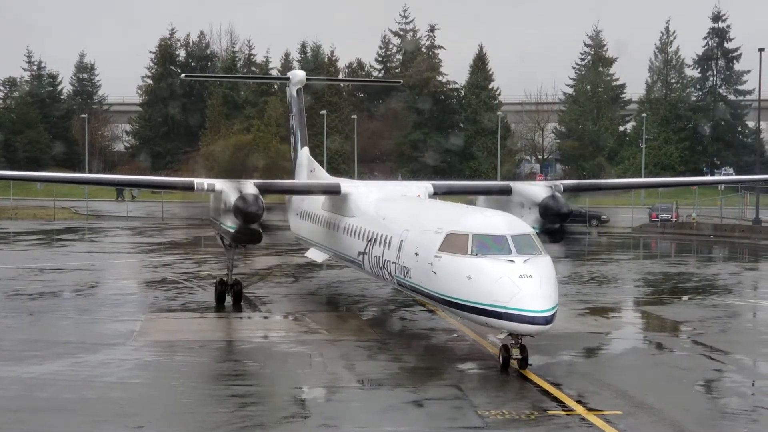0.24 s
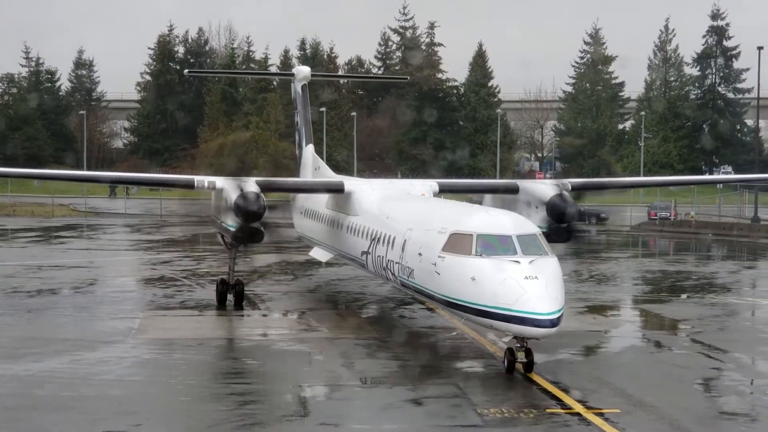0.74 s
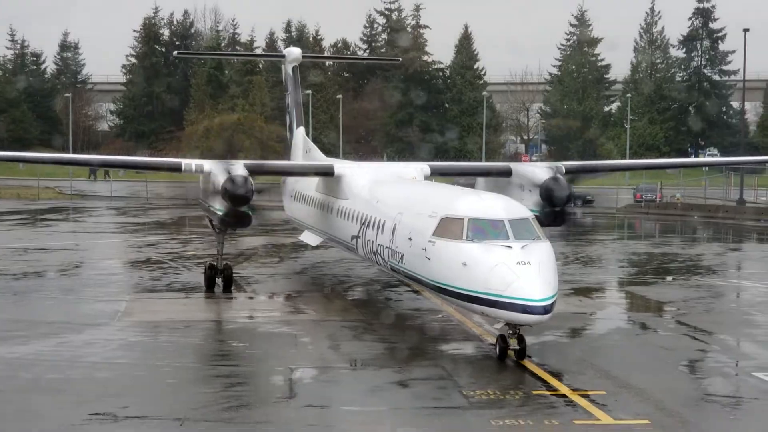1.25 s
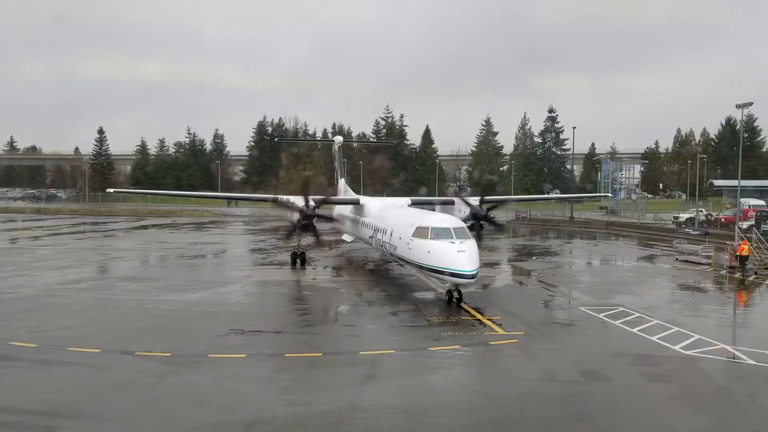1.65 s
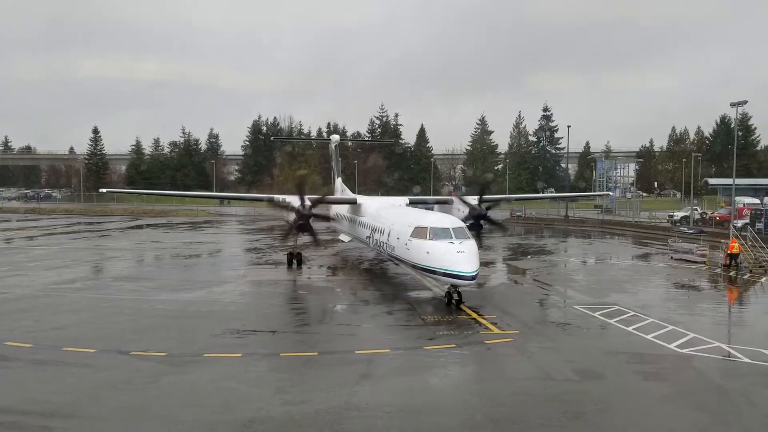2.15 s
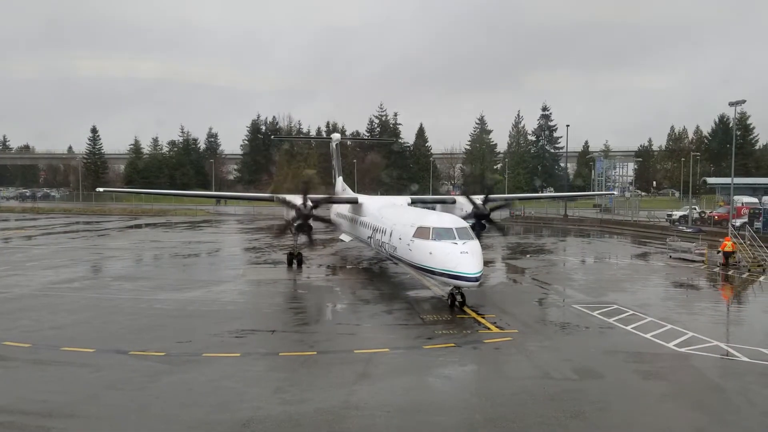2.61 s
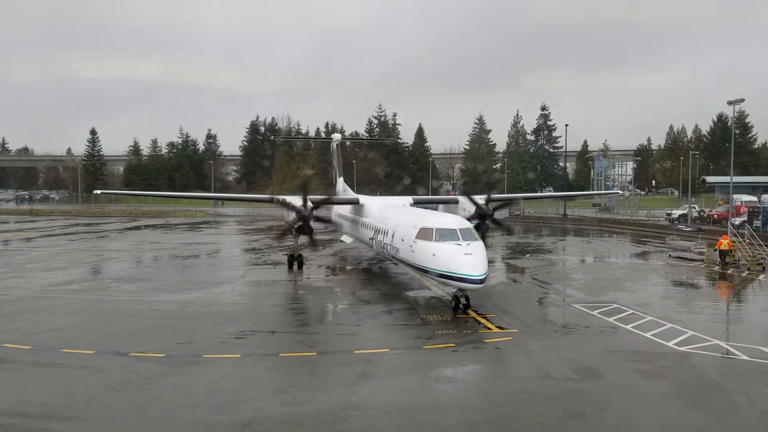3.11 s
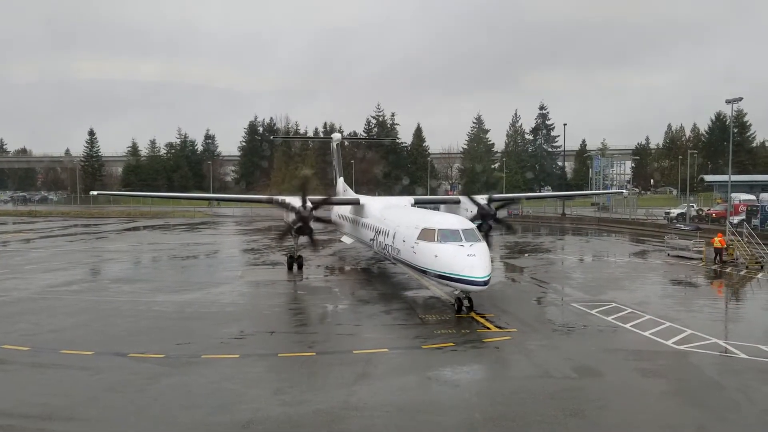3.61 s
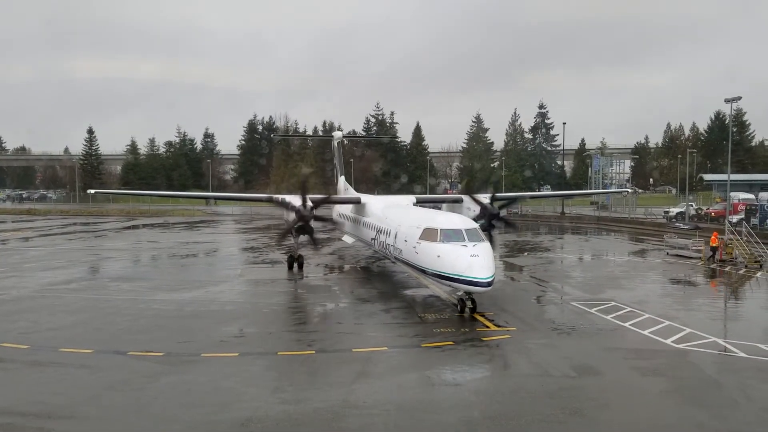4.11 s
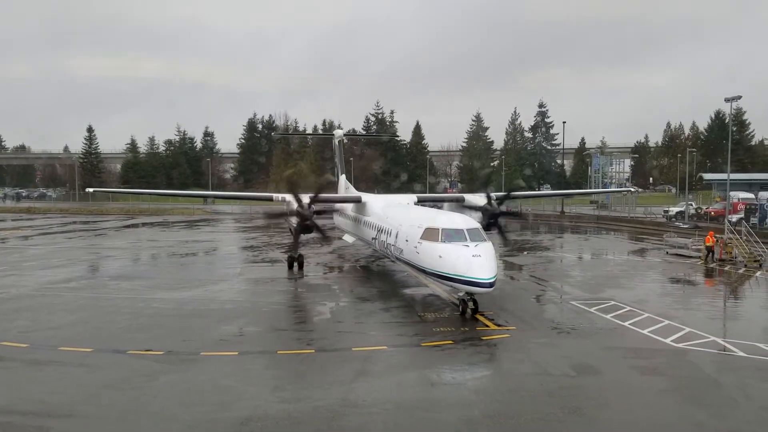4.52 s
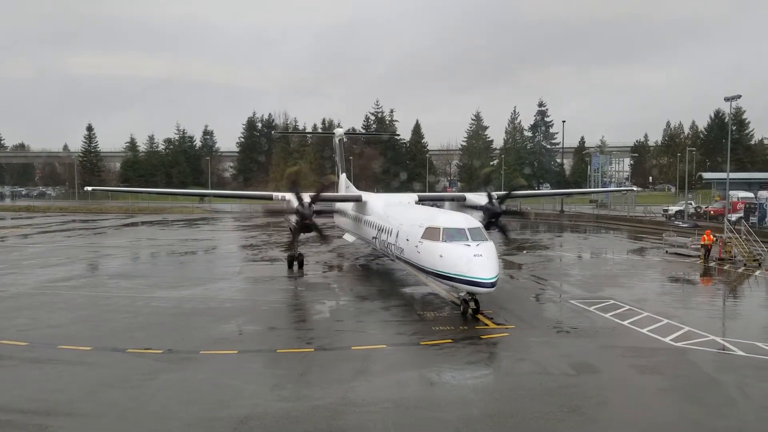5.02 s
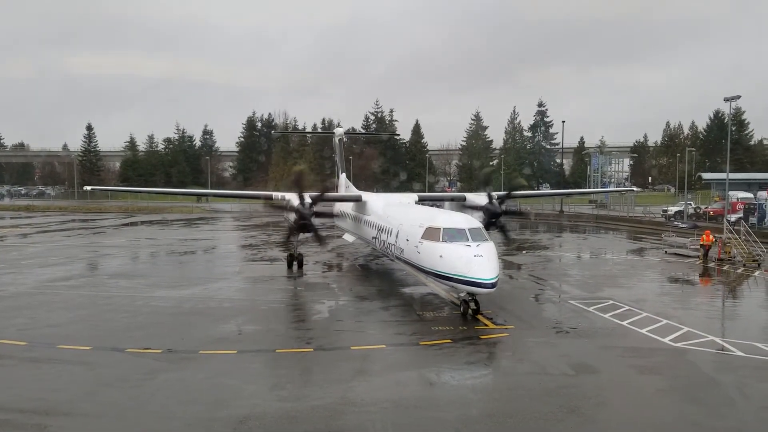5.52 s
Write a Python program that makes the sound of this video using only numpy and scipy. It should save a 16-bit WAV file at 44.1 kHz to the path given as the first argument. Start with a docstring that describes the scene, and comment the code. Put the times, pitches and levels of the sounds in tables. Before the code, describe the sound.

Continuous turboprop engine noise heard in stereo from some distance outside: uneven deep propeller hum, rushing wash and hissing intakes, with a thin, rough-edged, high whine leaning left. A cluster of close dry clicks comes early, followed by one faint chirp; another lighter click arrives late. The roar gradually swells in the last part as the aircraft taxis closer, ending still running.

```python
"""Wet apron: a twin turboprop taxis towards the microphones.
Each compressor whines near 4.1 kHz, chopped into sidebands by its six propeller blades.
The propellers drone as pairs of wavering tones; intakes and exhausts roar as coloured noise.
Close by, dry noise bursts snap, mostly early on, and a brief faint tone squeaks once."""
import sys
import numpy as np
from scipy import signal
from scipy.fft import rfft, irfft, next_fast_len
from scipy.io import wavfile
from scipy.ndimage import uniform_filter1d, map_coordinates

SR = 44100
rng = np.random.default_rng(int(sys.argv[2]) if len(sys.argv) > 2 else 0)


def rack_gain(trim_db):
    """Turn a fader trim in dB into the linear factor to multiply a signal by."""
    fader = np.asarray(trim_db, float)
    return 10 ** (fader / 20)


def store_wav(level_fs):
    """Save 16-bit WAV to argv[1]."""
    pcm = np.round(np.clip(np.atleast_2d(level_fs), -1, 1) * 32767)
    wavfile.write(sys.argv[1], SR, pcm.T.astype(np.int16))


N = 253575


def unit(x):
    """Scale to rms 1 over all channels."""
    return x / np.sqrt(np.mean(x ** 2) + 1e-20)


def along(points, hz):
    """Interpolate (hz, value) points on a log frequency axis."""
    point_hz, value = np.transpose(points)
    return np.interp(np.log(hz + 1), np.log(point_hz + 1), value)


def spectrum(points):
    """Gain function of frequency from (hz, gain_db) points."""
    return lambda hz: rack_gain(along(points, hz))


def peaks(modes):
    """Gain function of frequency: a sum of narrow (centre_hz, width_hz, level_db) bands."""
    return lambda hz: sum(rack_gain(level_db) / np.sqrt(width_hz) / (1 + (2 * (hz - centre_hz) / width_hz) ** 4)
                          for centre_hz, width_hz, level_db in modes)


def curves(rows):
    """One value per sample for each column after the time."""
    time_s, *columns = np.transpose(rows)
    return [np.interp(np.arange(N) / SR, time_s, column) for column in columns]


def wobble(rate_per_s):
    """Smooth random curve through normal knots, at most 60 a second."""
    return map_coordinates(rng.standard_normal(400), [np.arange(N) * np.clip(rate_per_s, 0, 60) / SR])


def tone(hz, turn_cycles=0):
    """Sine of rms 1 that follows a pitch curve from a random phase."""
    return np.sqrt(2) * np.sin(2 * np.pi * (np.cumsum(hz) / SR + rng.random() + turn_cycles))


# left-right correlation before the lean: hz, correlation
LIKENESS = [(60, 0.91), (110, 1), (200, 0.9), (380, 0.7), (700, 0.66), (1290, 0.065), (2380, 0.56),
            (4390, 0.31), (8110, 0.33), (15000, 0.12)]
# stereo lean: hz, left_over_right_db
STEREO_LEAN = [(60, -1.5), (180, 2.5), (550, 1), (1650, 2.5), (4970, 4), (15000, 1)]


def rush(gain, patchy_db):
    """Stereo noise, rms 1 over both channels, coloured by gain(hz), in time-frequency patches."""
    bins = signal.stft(rng.standard_normal((2, N)), nperseg=512)[2]
    field = uniform_filter1d(rng.standard_normal(bins.shape[1:]), 6, 0)
    field = uniform_filter1d(field, 14, 1)
    pair = signal.istft(bins * rack_gain(patchy_db * unit(field)), nperseg=512)[1]
    size = next_fast_len(N + 8192)
    hz = np.fft.rfftfreq(size, 1 / SR)
    # mid/side balance sets the correlation
    angle = np.arccos(np.clip(along(LIKENESS, hz), -1, 1)) / 2
    mid, side = rfft(pair, size) * gain(hz) * [np.cos(angle), np.sin(angle)]
    lean = rack_gain(along(STEREO_LEAN, hz) / 2)
    return unit(irfft([(mid + side) * lean, (mid - side) / lean], size)[:, :N])


# level change as the aircraft comes closer: time_s, approach_db
APPROACH = [(0, 1), (.45, 0), (.9, -0.5), (3.0, 0.5), (4.0, 0.4), (4.5, 3.5), (5.05, 3.5), (5.55, 4),
            (5.75, 5)]


def approach():
    """Curve in dB that the wash, exhaust, hiss, ducts and upper hums follow by their own factors."""
    return curves(APPROACH)[0]


# prop wash noise: hz, relative_gain_db
AIRFLOW_SPECTRUM = [(12, -56), (25, -15.5), (60, -8.5), (96, -2), (115, -8), (170, -6), (260, -6.5),
                    (400, -10.5), (440, -16.5), (530, -12.5), (600, -16.5), (850, -21), (950, -41.5),
                    (1300, -53)]
# higher blade tones smeared into noise: centre_hz, width_hz, relative_level_db
WASH_BANDS = [(504.7, 7.2, -1), (545.5, 21, 0.5), (626, 22, -4.5)]
# exhaust noise: hz, relative_gain_db
EXHAUST_SPECTRUM = [(500, -27), (900, -1), (1450, -5), (1900, -4.5), (2300, -3.5), (3200, -43.5)]
# intake hiss: hz, relative_gain_db
HISS_SPECTRUM = [(1500, -16.5), (2200, -1), (2900, 2), (3500, -1), (4700, -2.5), (5850, -4), (7000, -11),
                 (8500, -25), (10000, -23), (11000, -30), (14200, -32), (14400, -49), (14700, -75)]
# faint duct resonances on the hiss: centre_hz, width_hz, relative_level_db
DUCT_BANDS = [(5870, 200, 0), (10030, 200, -15), (12350, 120, -19), (14170, 100, -18)]
# narrow noisy intake howl: centre_hz, width_hz, relative_level_db
HOWL_BANDS = [(2515, 140, 0), (2530, 50, -12)]
# intake howl before flutter: time_s, level_db
HOWL_CURVE = [(0, -53.5), (1.1, -53), (1.75, -51.5), (2.4, -51.5), (3.15, -45), (3.7, -48.5), (3.95, -43),
              (4.3, -49.5), (5.05, -44), (5.75, -47.5)]


def engines_roar():
    """Prop wash below, exhaust in the middle, intake hiss above, and noisy duct resonances."""
    approach_db = approach()
    flow_db = -32.5 + 0.88 * approach_db + .5 * wobble(2.98)
    exhaust_db = -49 + 1.35 * approach_db + .5 * wobble(2.98)
    hiss_db = -42 + 0.54 * approach_db + .5 * wobble(2.98)
    howl_db = curves(HOWL_CURVE)[0] + 1.16 * wobble(30)
    flow = rack_gain(flow_db) * rush(spectrum(AIRFLOW_SPECTRUM), patchy_db=0.64)
    wash = rack_gain(flow_db - 15) * rush(peaks(WASH_BANDS), patchy_db=0.5)
    exhaust = rack_gain(exhaust_db) * rush(spectrum(EXHAUST_SPECTRUM), patchy_db=0.98)
    hiss = rack_gain(hiss_db) * rush(spectrum(HISS_SPECTRUM), patchy_db=1.16)
    ducts = rack_gain(hiss_db - 17 + .3 * approach_db) * rush(peaks(DUCT_BANDS), patchy_db=4.0)
    howl = rack_gain(howl_db) * rush(peaks(HOWL_BANDS), patchy_db=-0.2)
    return flow + wash + exhaust + hiss + ducts + howl


# snaps near the microphones, nominal levels: start_s, body_db, rattle_t60_s, treble_db
SNAP_EVENTS = [(.478, -54, .15, -54), (.5, -56, .1, -58), (.515, -55, .03, -51), (0.572, -32.5, 0.1, -70),
               (.5785, -25.5, .16, -39), (0.591, -36, 0.12, -56), (.598, -43, .1, -62),
               (.605, -44, .2, -66), (1.625, -58, .08, -62), (4.37, -43, .1, -60), (5.2, -54, .3, -58)]
# snap body: hz, relative_gain_db
SNAP_SPECTRUM = [(600, -24), (1000, -12), (2000, -10), (2600, -5), (3400, -1), (4300, -6), (5800, 0),
                 (7200, -7), (8200, -15), (10000, -16), (12000, -23), (15400, -27)]
# snap treble: centre_hz, width_hz, relative_level_db
SNAP_TREBLE = [(10000, 1500, 0), (13000, 4000, -2)]


def snaps():
    """Dry noise bursts: a sharp head and a weaker, uneven rattle behind it."""
    head_t60_s, attack_s = .022, .0004
    t = np.arange(N) / SR
    envelopes = np.zeros((2, N))  # body, treble
    rattle = rack_gain(2.5 * unit(uniform_filter1d(rng.standard_normal(N), size=40)))
    for start_s, body_db, rattle_t60_s, treble_db in SNAP_EVENTS:
        since_s = np.clip(t - start_s, 0, None)
        attack = 1 - np.exp(-since_s / attack_s)
        head = rack_gain(-60 * since_s / head_t60_s)
        tail = .27 * rattle * rack_gain(-60 * since_s / rattle_t60_s)
        envelopes += rack_gain([[body_db], [treble_db]]) * attack * (head + tail)
    body = envelopes[0] * rush(spectrum(SNAP_SPECTRUM), patchy_db=0)
    treble = envelopes[1] * rush(peaks(SNAP_TREBLE), patchy_db=0)
    return body + treble


# faint squeak: start_s, length_s, pitch_hz, peak_rms_db
SQUEAK_EVENT = (.708, .035, 4900, -45)


def squeak():
    """A brief, nearly steady tone under a smooth rise and fall."""
    start_s, length_s, pitch_hz, peak_rms_db = SQUEAK_EVENT
    progress = np.clip((np.arange(N) / SR - start_s) / length_s, 0, 1)
    return rack_gain(peak_rms_db) * np.sin(np.pi * progress) * tone(pitch_hz + 6 * wobble(50))


# hums: main_hz, partner_hz, partner_re_main_db, waver_hz, waver_rate_per_s, flutter_db
HUM_PAIRS = [(66.06, 38, -18.5, 1.1, 5, 0.5), (131.2, 124, -4, 1.994, 8, 1.5),
             (195.1, 190, -10, 1.235, 6, 2.3), (251, 262, -4, 3.49, 12, 2.13),
             (328.7, 313, -4, 3.99, 12, 2.5), (379.2, 387, -2.5, 2.98, 10, 0.5)]
# lowest hum before dips and trim: time_s, level_db
LOW_HUM_CURVE = [(0, -37), (.5, -33.5), (1.3, -38), (1.85, -46), (2.15, -30), (2.5, -28.5), (2.65, -37),
                 (2.9, -30), (3.2, -37.5), (3.45, -26.5), (3.75, -31.5), (4.0, -36), (4.4, -39.5),
                 (4.9, -23), (5.03, -28), (5.15, -26.5), (5.3, -33), (5.75, -34)]
# hums above it, in order, before dips and trim: base_db, gain_db_per_approach_db
UPPER_HUM_LEVELS = [(-36.5, 1.38), (-37.5, .3), (-34.5, .5), (-40, -1.1), (-39.5, -0.6)]
# uneven loudness of the upper hums, louder stretches: middle_s, hum_hz, gain_db, length_s
HUM_LOUD_STRETCHES = [(0.096, 195, 12.5, 0.4), (0.103, 251, 7.5, 0.16), (0.295, 329, 5.5, 0.26),
                      (0.456, 378, 6, 0.28), (.5, 195, 9.5, 0.37), (.55, 251, 6.5, 0.11),
                      (1.0, 131, 7.5, 0.66), (1.0, 329, 4.5, 0.53), (1.03, 195, 11, 0.56),
                      (1.2, 251, 5.5, 0.6), (1.61, 378, 5, 0.37), (1.657, 195, 10, 0.58),
                      (1.948, 251, 6.5, .1), (2.0, 131, 11.5, 0.092), (2.098, 378, 7, 0.27),
                      (2.2, 131, 7, 0.16), (2.43, 195, 11, 0.2), (2.514, 251, 5.5, 1),
                      (2.832, 329, 10, .18), (2.86, 131, 9, 0.2), (2.927, 195, 12.5, 0.24),
                      (3.24, 251, 5.5, 0.21), (3.725, 195, 11, 0.4), (3.91, 378, 9, 0.089),
                      (3.92, 251, 9, .16), (3.96, 131, 7.5, 0.34), (4.202, 378, 9, 0.28),
                      (4.33, 195, 6.5, 0.32), (4.466, 251, 6, 0.16), (4.5, 131, 10, 0.059),
                      (4.818, 131, 3.5, 0.15), (4.89, 251, 4, 0.26), (5.2, 195, 7.5, .22),
                      (5.217, 378, 9.5, 0.14), (5.194, 251, 4.5, .1), (5.586, 251, 6.5, 0.49),
                      (5.652, 131, 5, 0.22)]


def hum_levels():
    """dB over time: lowest hum by its own curve, others by approach and louder stretches; all dip randomly."""
    dip_db, dip_rate_per_s = 1.8, 12
    approach_db = approach()
    levels = curves(LOW_HUM_CURVE)
    levels += [base_db + growth * approach_db for base_db, growth in UPPER_HUM_LEVELS]
    levels = np.array([db - dip_db * np.clip(wobble(dip_rate_per_s), 0, None) ** 2 for db in levels])
    for middle_s, hum_hz, gain_db, length_s in HUM_LOUD_STRETCHES:
        nearest = np.argmin([abs(hum[0] - hum_hz) for hum in HUM_PAIRS])
        levels[nearest] += gain_db * np.exp(-(2 * (np.arange(N) / SR - middle_s) / length_s) ** 4)
    return levels


def propellers():
    """Blade tones blurred by turbulence: each hum is two wavering tones, mostly close enough to beat;
    the lowest has a faint deeper one."""
    hums = 0
    for level_db, hum in zip(hum_levels(), HUM_PAIRS):
        main_hz, partner_hz, partner_db, waver_hz, rate_per_s, flutter_db = hum
        for hz, offset_db in ((main_hz, 0), (partner_hz, partner_db)):
            line_db = level_db + offset_db + flutter_db * wobble(2.5 * rate_per_s)
            hums = hums + rack_gain(line_db) * tone(hz + waver_hz * wobble(rate_per_s))
    return hums * rack_gain([[-1.1], [-2.2]])  # left, right trim


# outer sidebands before flutter: blade_multiple, left_rms_db
OUTER_SIDEBANDS = [(-3, -60), (-2, -56), (2, -49), (3, -52), (4, -59)]
# mean lean of the whine: time_s, left_over_right_db
WHINE_LEAN = [(0, 8), (1.4, 6), (2.2, 10), (3.0, 11), (4.0, 14), (4.65, 8), (5.2, 12), (5.55, 5), (5.75, 4)]


def whine(hz, levels):
    """Blades crossing the intake split the compressor tone; each line wavers apart at each microphone."""
    blade_hz = 66.2
    lean_sway_db, shimmer_db = 2.5, 1.1
    lower_db, centre_db, upper_db = curves(levels)
    lean_db = curves(WHINE_LEAN)[0] + lean_sway_db * wobble(3.2)
    hz = hz + .7 * wobble(12)
    main = ((-1, lower_db), (0, centre_db), (1, upper_db))
    lines = [(multiple, db + shimmer_db * wobble(7)) for multiple, db in main]
    lines += [(multiple, db + 4 * wobble(5)) for multiple, db in OUTER_SIDEBANDS]
    out = np.zeros((2, N))
    for multiple, db in lines:
        left_db = db + 1.1 * wobble(25)
        right_db = left_db - lean_db + 2.2 * wobble(4)
        path_cycles = np.array([.03 * wobble(30), .11 * wobble(3)])  # left, right
        out += rack_gain([left_db, right_db]) * tone(hz + multiple * blade_hz, path_cycles)
    # turbulence scatters part of the tone into a noisy skirt
    skirt = rush(lambda f: 1 / (1 + ((f - 4160) / 130) ** 2), patchy_db=-1.5)
    skirt_db = -46.5 + 0.53 * (uniform_filter1d(centre_db, SR) + 44.5)  # 1 s mean
    return out + rack_gain(skirt_db) * skirt


# compressor pitches before jitter: time_s, first_hz, second_hz
SPOOL_PITCHES = [(0, 4108, 4137), (1.1, 4106.5, 4136), (1.9, 4104, 4137), (2.7, 4104, 4134),
                 (3.6, 4104, 4125.5), (4.2, 4099.5, 4121.5), (4.8, 4095, 4115.5), (5.15, 4099, 4114),
                 (5.75, 4111, 4111)]
# first engine, left levels before flutter: time_s, lower_sideband_db, centre_db, upper_sideband_db
FIRST_LEVELS = [(0, -45, -39, -49), (.3, -45, -46, -37), (.5, -48, -45, -40), (.82, -42, -38, -40),
                (1.3, -47, -47, -46), (1.62, -58, -42, -48), (2.0, -44, -37, -41), (2.2, -46, -41, -38),
                (2.36, -46, -53, -38), (2.6, -46, -37, -41), (2.8, -48, -38, -50), (2.95, -53, -34.5, -41),
                (3.15, -53, -40, -43), (3.52, -42, -33, -39), (3.95, -53, -35, -36), (4.2, -49, -39, -41),
                (4.7, -49, -28.5, -43), (4.9, -48, -31, -39), (5.17, -48, -27, -40),
                (5.47, -43, -30, -38.5), (5.53, -42, -41, -45), (5.7, -42, -33, -42)]
# second engine, left levels before flutter: time_s, lower_sideband_db, centre_db, upper_sideband_db
SECOND_LEVELS = [(0, -44, -47, -35.5), (.25, -44, -42, -39), (.6, -46, -51, -44), (.95, -44, -38, -36.5),
                 (1.2, -43, -52, -43), (1.5, -38, -43, -39), (1.9, -50, -39.5, -44), (2.06, -45, -44, -39),
                 (2.21, -41, -40, -39), (2.42, -41, -55, -55), (2.65, -42, -42, -44), (2.8, -50, -50, -43),
                 (2.95, -47, -38, -42), (3.38, -52, -36, -41), (3.62, -50, -41, -50), (3.85, -43, -34, -44),
                 (4.13, -37, -35, -47), (4.42, -42, -29.5, -44), (4.85, -42, -48, -42),
                 (5.05, -35, -36, -54), (5.3, -38, -40, -45), (5.5, -48, -42, -52), (5.75, -48, -41, -50)]


def compressors():
    """Both compressors whine, each on its own pitch and level curves."""
    first_hz, second_hz = curves(SPOOL_PITCHES)
    return whine(first_hz, FIRST_LEVELS) + whine(second_hz, SECOND_LEVELS)


def scene():
    """Roar, small sounds near the microphones, propellers and both compressors."""
    return engines_roar() + snaps() + squeak() + propellers() + compressors()


def top_cut(x):
    """Nothing passes above the cut-off."""
    return signal.sosfilt(signal.butter(12, 15580, fs=SR, output="sos"), x)


def record(dry):
    """Band limit: 12 dB down from 14.3 kHz up."""
    size = next_fast_len(N + 8192)
    keep = np.where(np.fft.rfftfreq(size, 1 / SR) < 14300, 1, rack_gain(-12))
    mix = irfft(rfft(dry, size) * keep, size)[:, :N]
    return top_cut(mix)


dry = scene()
out = record(dry)
store_wav(out)
```